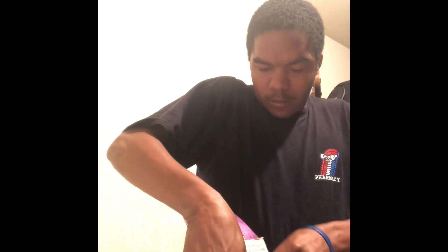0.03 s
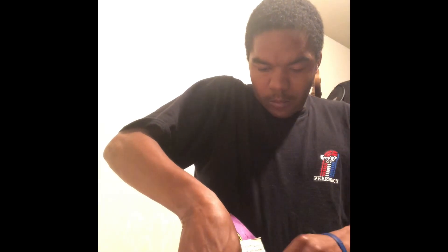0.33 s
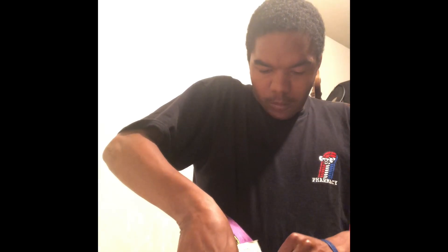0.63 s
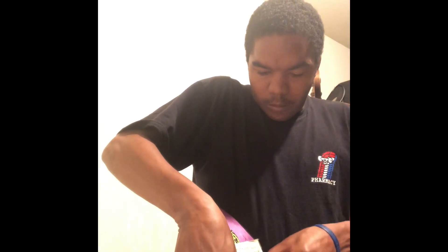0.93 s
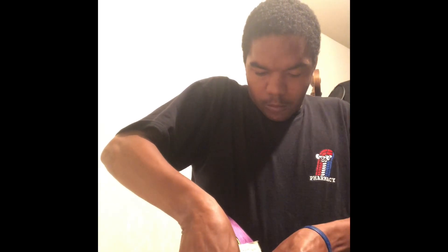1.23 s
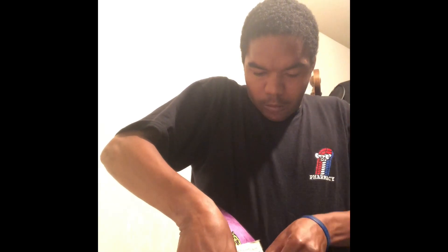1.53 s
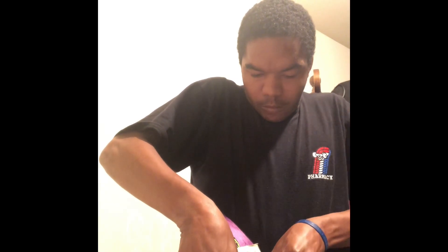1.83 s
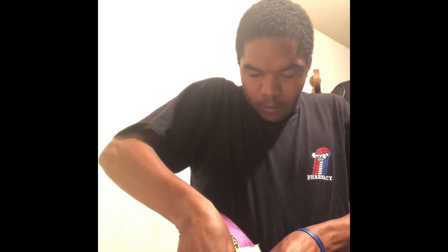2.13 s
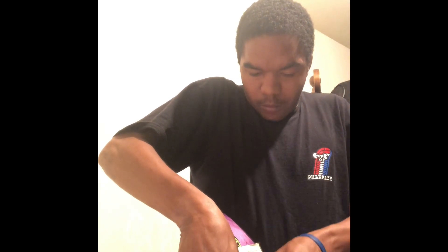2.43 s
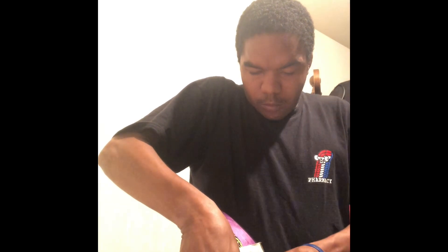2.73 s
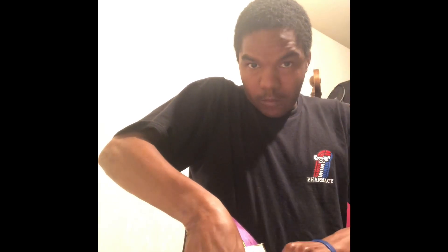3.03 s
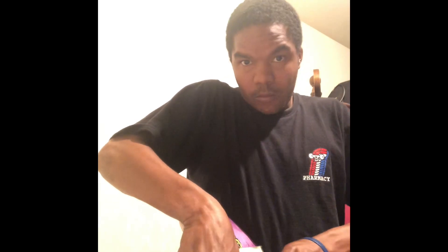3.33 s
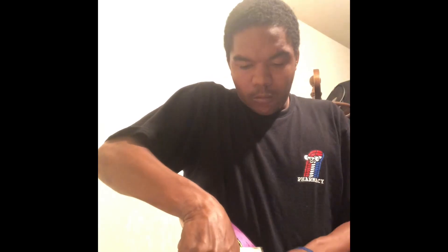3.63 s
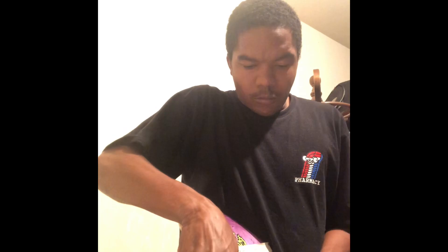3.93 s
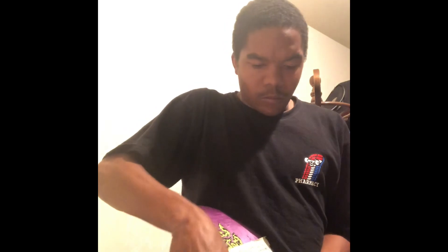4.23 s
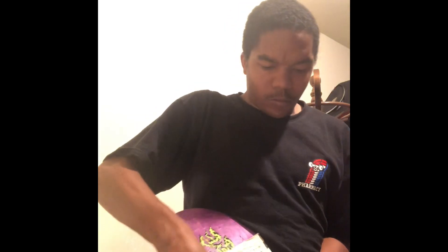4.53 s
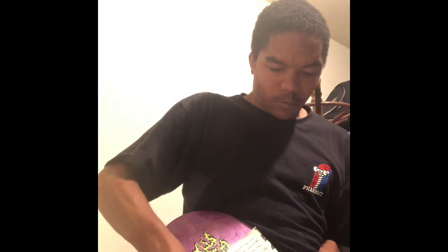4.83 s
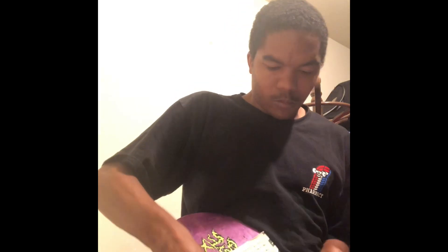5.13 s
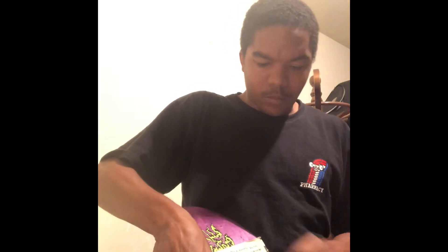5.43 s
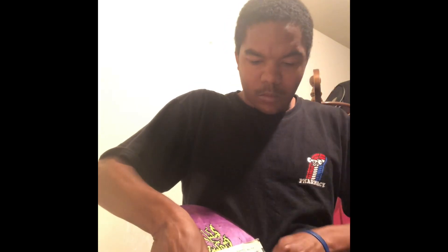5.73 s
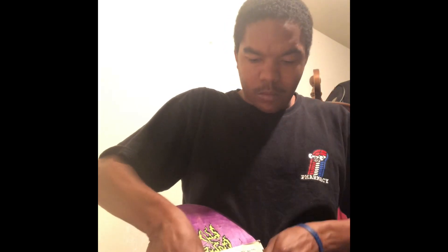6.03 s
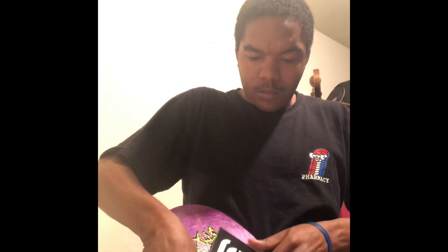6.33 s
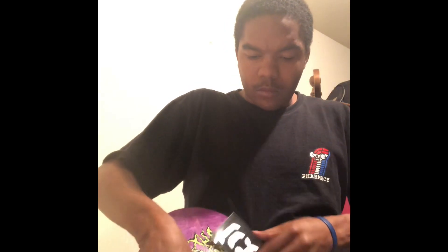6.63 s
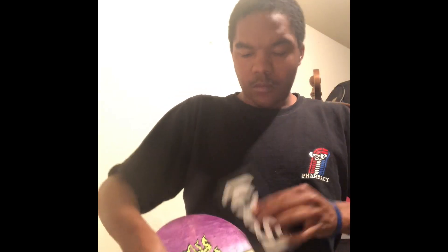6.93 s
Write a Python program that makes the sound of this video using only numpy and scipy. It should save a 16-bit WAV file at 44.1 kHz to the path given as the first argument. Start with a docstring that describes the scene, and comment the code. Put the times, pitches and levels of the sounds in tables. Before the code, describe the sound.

In a small, quietly humming room, thin plastic wrapping ticks and crinkles softly as fingers pick at it near the microphone. The crackling builds into a short, thick stretch of tearing, with crisp snaps, hollow pops of bending card and one especially loud crack. Afterwards the handling turns light again, with card rubbing under the fingers and a few last crinkles.

```python
"""Unwrapping a new item

Hands work an item out of its plastic wrapping and card packaging, close by in a small room.
The film crinkles faintly, then is pulled and torn in a dense burst: its creases snap, and the card
buckles with hollow pops and slides under the fingers. The room hums quietly behind."""
import sys
import numpy as np
from scipy import signal
from scipy.fft import rfft, irfft, next_fast_len
from scipy.io import wavfile

SR = 44100
rng = np.random.default_rng(int(sys.argv[2]) if len(sys.argv) > 2 else 0)


def waveform_to_disk(signal):
    """Save audio, clipped to [-1, 1], as 16-bit WAV at the path in sys.argv[1]."""
    frames = np.transpose(np.atleast_2d(signal))
    scaled = np.clip(frames, -1, 1) * 32767
    samples = np.round(scaled).astype(np.int16)
    wavfile.write(sys.argv[1], SR, samples)


N = 307818
TIME = np.arange(N) / SR

# tone of the room's background noise: (frequency [Hz], relative level [dB])
AIR_SPECTRUM = [(25, -18), (40, -6.5), (60, -2.5), (85, -7), (110, -2), (145, 0.5), (190, -4), (260, -4.5),
                (390, -5), (470, -9.5), (800, -15), (2000, -32.5), (6000, -34), (16000, -38)]
# drones in that noise: (pitch [Hz], level [dB], bandwidth [Hz])
DRONES = [(57.6, -73.5, 3), (145, -62.5, 14.4), (235.6, -73.5, 6.1), (299.5, -66.5, 12), (377.3, -64.5, 9),
          (1032, -70.5, 190), (1610, -79, 50)]
# how much the film crinkles as the hands keep working it between strokes: (time [s], level [dB])
HANDLING = [(0, -81.5), (0.8, -72.5), (1.16, -77), (1.5, -68), (2.0, -75.5), (2.2, -82), (2.3, -59.5),
            (2.65, -55.5), (3.3, -66), (3.6, -47), (4.2, -44.5), (4.85, -47), (5.3, -53.5), (5.6, -65),
            (5.77, -57.5), (6.03, -59.5), (6.33, -75.5), (6.98, -68)]
# strokes of the hand: (start [s], length [s], crinkle level [dB],
# card rubbing above the crinkle [dB], finest crackle above the crinkle [dB])
STROKES = [(0.026, .13, -70, -2, 2), (0.302, 0.12, -74, -7, 0.5), (0.576, .08, -66.5, -8, -1),
           (0.645, 0.039, -63.5, 6.5, -3), (0.856, 0.045, -65.5, -9, 5), (0.917, 0.039, -58, -1, -7),
           (1.331, 0.15, -68, -16, -0.5), (1.537, 0.025, -63, -10, -4), (1.653, 0.057, -59, 1, -2),
           (1.762, 0.02, -65, 6, 0), (1.905, 0.034, -62.5, -3, -2), (2.057, 0.022, -61, -22, 0),
           (2.215, 0.062, -57.5, -9, -1.5), (2.564, 0.083, -53.5, -20, 1), (2.772, 0.047, -52, -11, -10),
           (2.88, 0.026, -51.5, -5, -0.5), (3.03, 0.049, -58, -16, -1.5), (3.157, 0.037, -54.5, -15, -3.5),
           (3.335, 0.045, -47.5, -1, -2.5), (3.436, 0.099, -46.5, -6, -5), (3.654, 0.16, -42, -3, -8),
           (3.996, 0.044, -42.5, -25, -14), (4.224, 0.064, -41.5, -1, -2.5), (4.398, 0.022, -36, -0.5, -2),
           (4.609, 0.033, -38.5, -6.5, -8), (4.727, 0.23, -43, -4, -6), (5.053, .17, -48, -9, -9.5),
           (5.361, 0.044, -44, -5, -4), (5.437, 0.096, -51.5, -1, -4.5), (5.834, 0.053, -53.5, 2.5, -11),
           (5.921, 0.069, -55, 2.5, -10), (6.059, 0.16, -51.5, -6, -3.5), (6.342, .11, -55.5, -9, -10),
           (6.564, .04, -59.5, -2.5, -21), (6.685, 0.057, -57, -11, -25), (6.81, 0.024, -64, 0, -24)]
# tiny creases of five sizes, each with its own tick: (pitch [Hz])
TICK_PITCHES = [2770, 4000, 5400, 6700, 10400]
# tone of the film's crinkle: (frequency [Hz], relative level [dB])
CRINKLE_SPECTRUM = [(1000, -17), (2150, -3.5), (2800, 1), (4600, 3), (6000, 1), (7800, 3), (8800, -19),
                    (14000, -32)]
# tone of the film's finest, highest crackle: (frequency [Hz], relative level [dB])
CRACKLE_SPECTRUM = [(5000, -46), (7500, -15), (8600, 2.5), (10500, 4.5), (12000, 4), (14000, 6), (16000, 0)]
# tone of sliding card: (frequency [Hz], relative level [dB])
RUB_SPECTRUM = [(200, -10.5), (350, 0.5), (600, -3), (900, 5), (1100, -0.5), (1500, 0.5), (2000, 0),
                (2800, -4), (5000, -33)]
# the clearest creases snapping through: (time [s], relative level [dB], brightness [Hz])
CREASE_SNAPS = [(0.053, -45.5, 5750), (0.3741, -53, 3870), (0.5494, -51, 7600), (0.6735, -41.5, 4100),
                (0.7509, -49, 8700), (0.7859, -43, 7600), (1.0108, -45.5, 4670), (1.0726, -51.5, 6200),
                (1.2186, -52, 6300), (1.42, -48, 8500), (1.475, -52, 5500), (1.6896, -38.5, 4200),
                (1.777, -49, 5000), (1.9199, -45, 8250), (2.0817, -49, 7000), (2.136, -51, 11100),
                (2.2234, -38.5, 5430), (2.37, -37.5, 5400), (2.4099, -37, 5070), (2.585, -33, 6360),
                (2.6547, -32, 6400), (2.7788, -36, 3600), (2.9027, -30, 4700), (3.0759, -34, 6950),
                (3.1753, -36.5, 3900), (3.2645, -40, 7500), (3.3339, -41, 6730), (3.4625, -30.5, 5300),
                (3.5895, -27.5, 6600), (3.68, -27.5, 5500), (3.797, -26.5, 4000), (3.8402, -25.5, 4400),
                (3.8794, -15.5, 4000), (4.0043, -24, 4130), (4.008, -26, 4400), (4.1446, -23.5, 4550),
                (4.3082, -21.5, 9300), (4.3218, -24.5, 4570), (4.371, -25, 6600), (4.4093, -23.5, 4100),
                (4.4153, -7.5, 4940), (4.5581, -26, 4000), (4.6064, -16.5, 3830), (4.627, -31, 4500),
                (4.7423, -24.5, 6250), (4.7572, -25, 3880), (4.7745, -17, 4000), (4.877, -18.5, 4130),
                (4.993, -26.5, 5550), (5.2098, -35.5, 6140), (5.4029, -29.5, 4000), (5.9417, -32.5, 4500),
                (6.0765, -32.5, 9500), (6.4647, -41, 3160), (6.5904, -41.5, 4330)]
# the card buckling or being knocked: (time [s], relative level [dB], pitch of the bending patch [Hz])
CARD_POPS = [(.677, -48, 1360), (1.690, -53, 1310), (1.707, -43.5, 410), (1.786, -55, 1320),
             (1.936, -55, 600), (2.584, -50, 1300), (2.655, -50.5, 1100), (2.9033, -38, 1120),
             (2.909, -45, 600), (3.175, -47.5, 605), (3.497, -39, 1170), (3.68, -32, 1270),
             (3.686, -42, 800), (3.761, -36.5, 756), (3.8794, -37, 870), (3.917, -46, 447),
             (4.1443, -35, 1060), (4.4153, -16, 1640), (4.421, -31.5, 540), (4.6064, -30, 1520),
             (4.649, -40, 625), (4.7748, -33, 1090), (4.877, -27, 1570), (4.883, -36, 450),
             (5.4027, -41, 634), (5.850, -46.5, 800), (6.075, -50.5, 1190)]
# notes the card pack rings with: (pitch [Hz], relative level [dB], time to fade by 60 dB [s])
CARD_NOTES = [(385, 22.5, 0.064), (406, -12, 0.06), (545, 17, 0.13), (600, 22, 0.023), (691, 11.5, 0.14),
              (980, -19, 0.17), (955, 20, 0.053), (1130, 3.5, 0.06), (1457, 12.5, 0.035), (1553, 9, 0.068),
              (1610, -11, 0.091), (1864, 14, 0.029)]
# short slides of the wrapping: (middle [s], level [dB], half length [s], pitch [Hz], bandwidth [Hz])
SWIPES = [(1.702, -59, 0.017, 2500, 5000), (3.403, -42.5, 0.004, 2190, 1500), (3.783, -43, 0.017, 890, 298),
          (3.876, -42, 0.023, 900, 250), (4.247, -42, 0.11, 1860, 1520), (4.46, -50, 0.053, 1860, 500),
          (5.164, -47, 0.0053, 1880, 300), (5.852, -41.5, 0.014, 2500, 7000), (6.42, -58, 0.078, 2780, 500),
          (6.72, -60.5, 0.044, 2660, 505)]
# soft bumps of the hand on the item: (time [s], starting level [dB])
HAND_BUMPS = [(1.695, -43), (1.727, -39.5)]
# how long the room's echo lasts: (frequency [Hz], time to fade by 60 dB [s])
ROOM_FADE = [(200, 0.75), (530, 0.3), (1400, 0.55), (3700, 0.39), (9700, 0.5), (16000, 0.11)]


def from_db(db):
    """Turn decibels into a factor to multiply a sound by."""
    return 10 ** (np.asarray(db) / 20)


def rms_one(x):
    """Scale a sound so its average power is 1."""
    return x / np.sqrt(np.mean(x ** 2) + 1e-20)


def unit_energy(x):
    """Scale a sound so its total energy is 1."""
    return x / np.sqrt(np.sum(x ** 2) + 1e-20)


def at_hz(points, hz):
    """Read between the rows of a table, with octaves evenly spaced."""
    known_hz, values = np.transpose(points)
    return np.interp(np.log(np.maximum(hz, 1)), np.log(known_hz), values)


def colour(x, spectrum):
    """Give a sound the tone in a table, at an average power of 1."""
    size = next_fast_len(N)
    gains = from_db(at_hz(spectrum, np.fft.rfftfreq(size, 1 / SR)))
    return rms_one(irfft(rfft(x, size) * gains, size)[:N])


def drift(turns_per_s):
    """A curve that wanders at random, typically by about 1."""
    points = rng.standard_normal(4096)
    return rms_one(np.interp(TIME * turns_per_s, np.arange(len(points)), points))


def resonate(x, hz, width_hz):
    """Make a sound ring at a pitch; the narrower the band, the longer it rings."""
    r = np.exp(-np.pi * width_hz / SR)
    return signal.lfilter([1, 0, -1], [1, -2 * r * np.cos(2 * np.pi * hz / SR), r * r], x)


def add(out, s, sound):
    """Mix a sound in at s seconds."""
    start = int(np.clip(round(s * SR), 0, N - 1))
    out[start:start + len(sound)] += sound[:N - start]


def clicks(per_s, spread_db):
    """Random clicks, many small and few large."""
    happens = rng.random(N) < per_s / SR
    size_db = spread_db * np.minimum(rng.exponential(1, N), 2.6)
    return happens * from_db(size_db) * rng.choice([-1, 1], N)


def sheet_travel(x, travel_s, reference_hz=4000):
    """High notes cross a bending sheet faster, so a click leaves it as a tiny falling chirp."""
    size = next_fast_len(N)
    hz = np.fft.rfftfreq(size, 1 / SR)
    cycles = travel_s * (2 * np.sqrt(hz * reference_hz) - hz)
    return irfft(rfft(x, size) * np.exp(-2j * np.pi * cycles), size)[:N]


def radiate(x, lowest_hz):
    """A small patch is poor at pushing air slowly, so its low notes fall away."""
    return signal.sosfilt(signal.butter(2, lowest_hz, "high", fs=SR, output="sos"), x)


def room_hum(air_db=-58):
    """Low, steady air noise with a few wavering drones."""
    hum = 0
    for hz, db, width_hz in DRONES:
        drone = resonate(rng.standard_normal(N + SR), hz, width_hz)[SR:]  # skip its build-up
        hum += from_db(db) * rms_one(drone)
    return hum + from_db(air_db) * colour(rng.standard_normal(N), AIR_SPECTRUM)


def hand_levels(grip_s=0.01, release_s=0.018):
    """Crinkle, rubbing and crackle levels in dB: steady handling plus strokes that grip, pull, let go."""
    steady_db = np.interp(TIME, *np.transpose(HANDLING))
    offsets_db = np.array([[0], [-6], [-5.5]])  # crinkle, rubbing, crackle
    power = from_db(steady_db + offsets_db) ** 2
    for start, length, db, rub_db, crackle_db in STROKES:
        t = TIME - start
        grip = np.clip(t / grip_s, 0, 1)
        release = np.exp(-np.clip((t - length) / release_s, 0, 20))
        power += (from_db([[db], [db + rub_db], [db + crackle_db]]) * grip * release) ** 2
    return 10 * np.log10(power)


def film_crinkle(crinkle_db, crackle_db, most_per_s=6500, crowding=0.62, clump_db=3.0):
    """Tiny creases give way in clumps; the harder the film is worked, the closer they follow."""
    rate = most_per_s / len(TICK_PITCHES) * from_db(crowding * (crinkle_db - np.max(crinkle_db)))
    ticks = 0
    for hz in TICK_PITCHES:
        breaks = clicks(rate, spread_db=4.0) / np.sqrt(rate)  # same power at any rate
        ticks += rms_one(resonate(breaks, hz, 0.5 * hz))
    hiss = 0.28 * rng.standard_normal(N)  # film sliding on film
    clumps = from_db(clump_db * drift(220))
    film = (rms_one(sheet_travel(ticks, travel_s=0.00029)) + hiss) * clumps
    crinkle = from_db(crinkle_db - 0.5) * colour(film, CRINKLE_SPECTRUM)
    crackle = from_db(crackle_db) * colour(film, CRACKLE_SPECTRUM)
    return crinkle + crackle


def card_rubbing(rub_db, flutter_db=3.0, gain_db=-2.5):
    """Card slides under the fingers in many little slips."""
    loudness = from_db(rub_db + gain_db + flutter_db * drift(80))
    return loudness * colour(clicks(per_s=2000, spread_db=3.5), RUB_SPECTRUM)


def crease_snaps(creases, edge=0.57, rustle=0.75, rustle_s=0.0018):
    """A crease gives way at once, rings very briefly and shakes the film around it."""
    out, t = np.zeros(N), TIME[:1024]
    for (s, db, hz), noise in zip(creases, rng.standard_normal((512, len(t)))):
        force = (t == 0) + rustle * unit_energy(noise * np.exp(-t / rustle_s))
        ring_hz = 0.67 * hz
        ring = resonate(force, ring_hz, width_hz=hz)
        ring = unit_energy(resonate(ring, ring_hz, width_hz=hz))
        crack = unit_energy(np.diff(force, prepend=0)) * hz / 5000  # tighter creases crack harder
        strength = from_db(db) * np.sqrt(0.001 * SR)  # the energy of 1 ms at this level
        add(out, s, strength * unit_energy(ring + edge * crack))
    return sheet_travel(radiate(out, lowest_hz=1570), travel_s=0.000349)


def stray_creases(crackle_db, per_s=22, above_db=13.5, spread_db=3, low_hz=3550, high_hz=8500):
    """Rows of lesser snaps at random times; taut, crackling film gives the strongest."""
    wait, size, brightness = rng.random((400, 3)).T
    s = np.cumsum(-np.log(1 - wait)) / per_s
    loudest_db = np.max(crackle_db)
    fall_db = loudest_db - np.interp(s, TIME, crackle_db)
    db = loudest_db + above_db - 0.9 * fall_db
    db += spread_db * np.sqrt(3) * (2 * size - 1)
    hz = low_hz * (high_hz / low_hz) ** brightness
    return np.transpose([s, db, hz])[s < TIME[-1]]


def card_pops(damping=0.64, ring_db=-5.0, soften_hz=3200, gain_db=1.5):
    """A patch of card flips with one quick swing, and the whole pack rings after it."""
    out, t = np.zeros(N), TIME[:8192]
    note_hz, note_db, fade_s = np.transpose(CARD_NOTES)
    notes = np.sin(2 * np.pi * note_hz[:, None] * t) * np.exp(-np.log(1000) * t / fade_s[:, None])
    signs = (-1) ** np.arange(len(note_hz))
    soften = signal.butter(2, soften_hz, fs=SR, output="sos")
    for (s, db, hz), chance in zip(CARD_POPS, rng.standard_normal((len(CARD_POPS), len(note_hz)))):
        flip = resonate(1.0 * (t == 0), hz, damping * hz)
        swing = unit_energy(signal.sosfilt(soften, flip))
        pack = (signs * from_db(note_db + 2 * chance)) @ notes  # each spot stirs its own mix of notes
        ring = unit_energy(signal.fftconvolve(swing, pack)[:len(t)])
        strength = from_db(db + gain_db) * np.sqrt(0.004 * SR)  # the energy of 4 ms at this level
        add(out, s, strength * (swing + from_db(ring_db) * ring))
    return sheet_travel(radiate(out, lowest_hz=222), travel_s=0.000826)


def film_swipes():
    """A quick pull drags film over card in a brief rasp, its tone set by the piece held taut."""
    out = np.zeros(N)
    for s, db, half_s, hz, width_hz in SWIPES:
        swell = from_db(db) * np.exp(-0.5 * np.minimum(((TIME - s) / half_s) ** 2, 100))
        slips = clicks(per_s=5000, spread_db=7.5)
        out += swell * rms_one(resonate(slips, hz, width_hz))
    return out


def hand_bumps(hz=140, decay_s=0.012):
    """A hand meets the item with a dull, low thud."""
    out, t = np.zeros(N), TIME[:SR // 2]
    for s, db in HAND_BUMPS:
        add(out, s, from_db(db) * np.sin(2 * np.pi * hz * t) * np.exp(-t / decay_s))
    return out


def room_echo(x, tail_db=-10.5, near_s=0.0067, near_db=-19.5, build_s=0.0018):
    """Add one echo from a near surface and a wash of echoes in which each octave fades at its own pace."""
    t = TIME[:SR // 2]
    noise, tail = rng.standard_normal(len(t)), 0
    octaves_hz = 125 * 2.0 ** np.arange(8)
    for low, high in zip(octaves_hz, octaves_hz[1:]):
        band = signal.sosfiltfilt(signal.butter(2, [low, high], "band", fs=SR, output="sos"), noise)
        fade_s = at_hz(ROOM_FADE, np.sqrt(low * high))
        tail += band * np.exp(-np.log(1000) * t / fade_s)
    response = from_db(tail_db) * unit_energy(tail * (1 - np.exp(-t / build_s)))
    response[round(near_s * SR)] += from_db(near_db)
    return x + signal.fftconvolve(x, response)[:N]


def scene():
    """Film and card sound in the room, over its quiet hum."""
    crinkle_db, rub_db, crackle_db = hand_levels()
    creases = [*CREASE_SNAPS, *stray_creases(crackle_db)]
    film = crease_snaps(creases) + film_crinkle(crinkle_db, crackle_db)
    card = card_pops() + card_rubbing(rub_db) + film_swipes() + hand_bumps()
    return (room_echo(film + card) + room_hum())[None]


def record(dry):
    """Cut the very highest treble off steeply."""
    cutoff_hz = 16100
    return signal.sosfilt(signal.ellip(10, 0.1, 80, cutoff_hz, fs=SR, output="sos"), dry)


dry = scene()
out = record(dry)
waveform_to_disk(out)
```